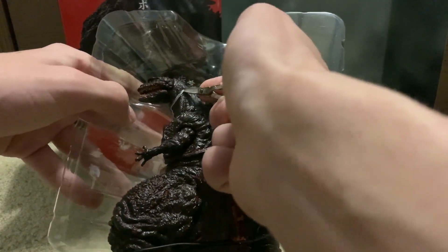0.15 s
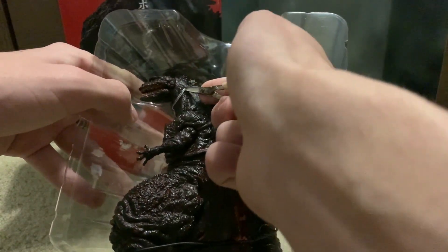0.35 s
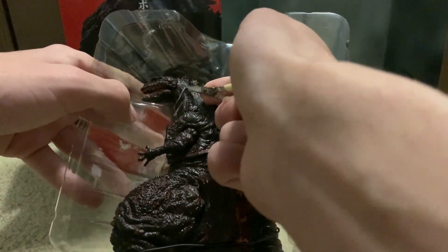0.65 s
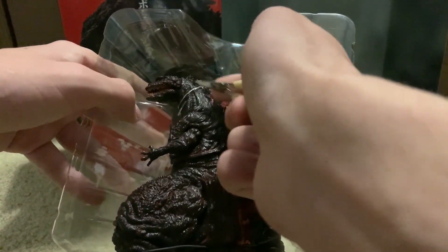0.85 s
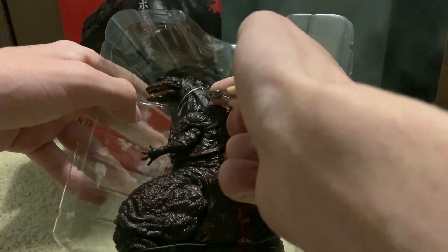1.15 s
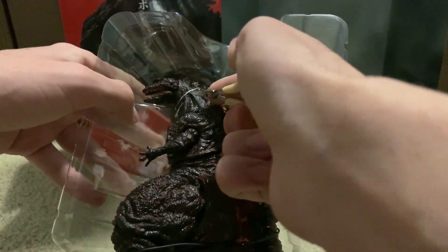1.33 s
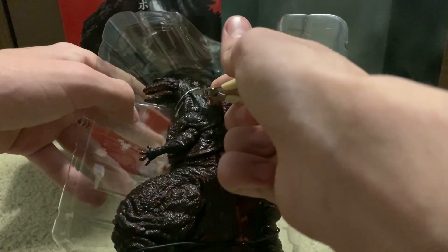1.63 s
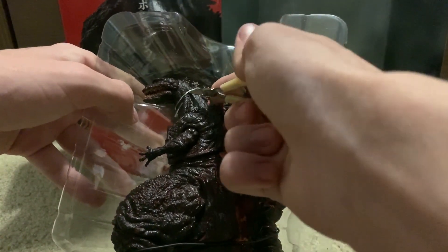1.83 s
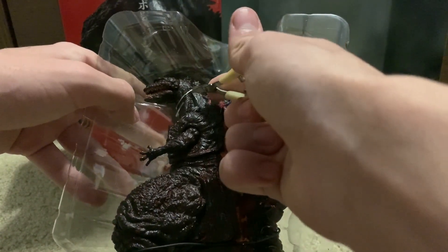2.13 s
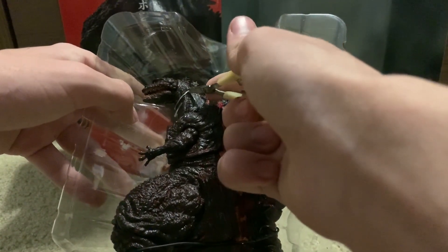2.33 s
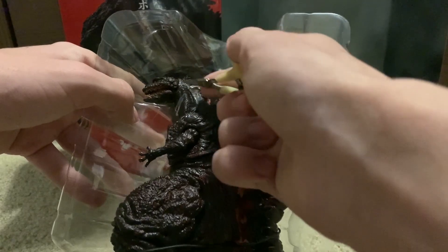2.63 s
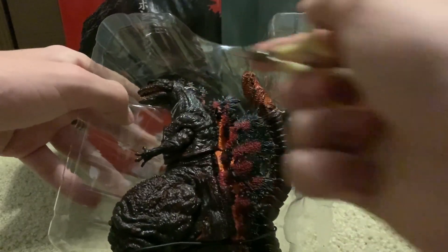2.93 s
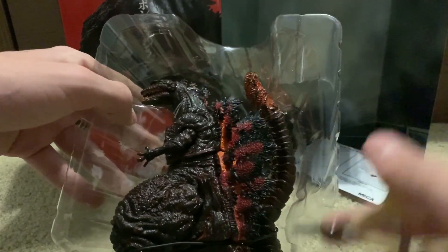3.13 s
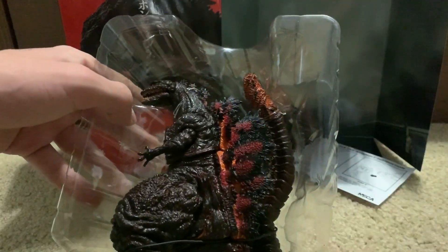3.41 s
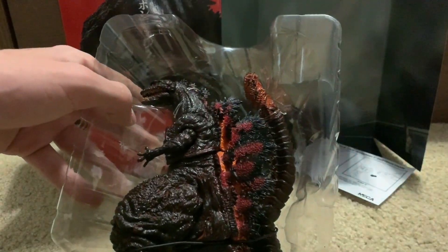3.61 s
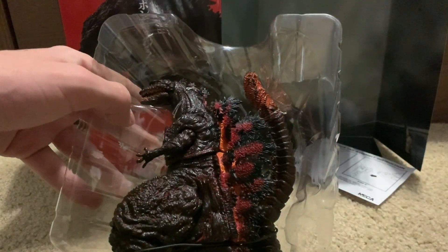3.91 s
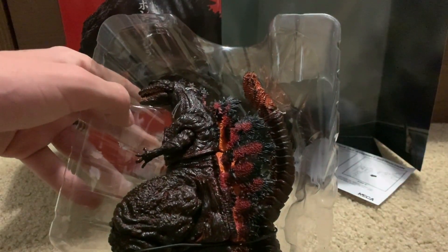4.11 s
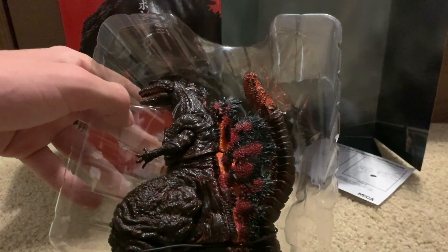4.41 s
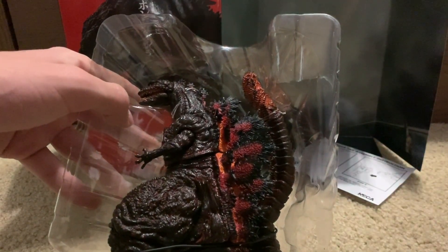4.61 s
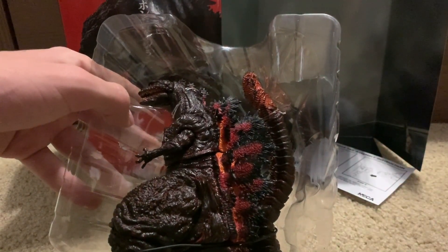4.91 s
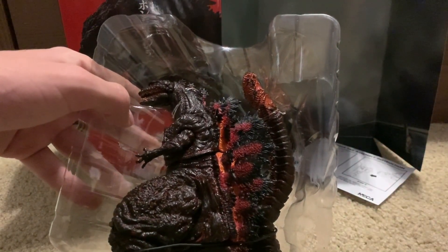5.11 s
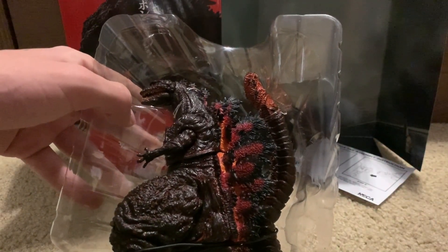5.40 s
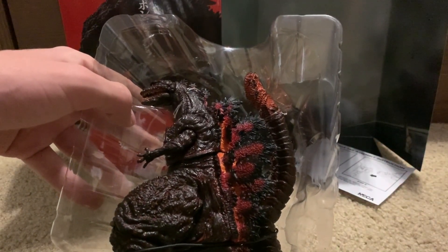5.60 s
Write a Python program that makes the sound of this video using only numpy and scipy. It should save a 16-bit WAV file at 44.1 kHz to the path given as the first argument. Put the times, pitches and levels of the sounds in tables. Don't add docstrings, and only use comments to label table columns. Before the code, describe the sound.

Heard very close in stereo, in a carpeted room with a short, quickly dying tail. Faint mains hum, uneven floor rumble and soft hiss continue throughout. The tail of an earlier snap opens it, with a tiny tap. From 0.3 to 0.8 seconds small scissors bite plastic ties in a dense run of sharp crackling snaps, strongest near 0.45 and 0.76, rattling a thin hollow tray. Light taps and knocks follow, then a snip at 2.06 and the hardest snap at 2.6, with short creaks around it. A distant engine climbs from 0.85, is loudest near 3.2, and drops away by 4.25. Taps and a brief sleeve swish come around 2.9, then near quiet. From 3.8 there are light plastic ticks, knocks and very faint short tones from the relaxing tray. A bright steel clack lands at 4.7, followed by faint ticks and soft finger rubs until about 5.6.

```python
import sys
import numpy as np
from scipy import signal
from scipy.fft import rfft, irfft, next_fast_len
from scipy.io import wavfile
from scipy.ndimage import uniform_filter1d

SR = 44100
rng = np.random.default_rng(int(sys.argv[2]) if len(sys.argv) > 2 else 0)


def how_loud(loudness_db):
    steps = np.asarray(loudness_db, float) / 20
    return 10 ** steps


def store_pcm(level_fs):
    pcm = np.round(np.clip(level_fs, -1, 1) * 32767).astype(np.int16)
    wavfile.write(sys.argv[1], SR, np.atleast_2d(pcm).T)


N = 253692

# (time [s], snap peak [dB], ring [Hz], tray thump [dB], blade fizz [dB])
EARLIER_SNAP = (0, -16, 4390, -27.5, -59)
EARLIER_S = 0.018
# (frequency [Hz], level [dB], t60 [s])
TRAY_MODES = [(195.85, -4, .15), (253.6, -7, 0.068), (315, -5.5, 0.079), (431, 3.5, 0.022),
              (482, -7, 0.057), (630, -6, 0.08)]
# (frequency [Hz], level [dB], t60 [s])
WALL_MODES = [(694, -4, 0.022), (1134, -9.5, .02), (1350, -5.5, 0.013), (1700, -0.5, 0.0071),
              (2240, 0, .012), (2800, -1, 0.012), (3500, -2.5, 0.015), (4250, 3.5, .007),
              (5400, -9, 0.0097)]
# (frequency [Hz], level [dB])
BLADE_TONE = [(2500, -42.5), (4500, -12), (6500, -5), (8000, 0), (10000, -0.5), (13000, -6.5),
              (15500, -6.5), (16800, -21)]
# (frequency [Hz], level [dB])
STEEL_TONE = [(2500, -34.5), (5800, -22.5), (7500, -6), (10300, -13), (12000, -2.5), (14300, -0.5),
              (15500, -15), (16800, -32.5)]
# (frequency [Hz], t60 [s])
ROOM_DECAY = [(150, .3), (500, 0.12), (1500, .3), (4000, 0.26), (9000, 0.28), (15000, 0.32)]
# (frequency [Hz], level [dB])
ROOM_TONE = [(150, -8.5), (500, -2), (1500, -15), (4000, -14.5), (9000, -20), (15600, -26), (16300, -45)]
# (frequency [Hz], level [dB])
HUM = [(60, -73.5), (120, -70), (188, -73), (360, -86), (480, -80.5), (1800, -100), (11300, -97.5),
       (13770, -96.5)]
# (time [s], level [dB])
RUMBLE = [(0.0, -86.5), (0.32, -71.5), (0.67, -60.5), (0.9, -73.5), (1.36, -75.5), (2.0, -70), (2.4, -72.5),
          (2.77, -64.5), (3.1, -75.5), (3.78, -76), (4.1, -68.5), (4.58, -80.5), (4.79, -69.5), (5.25, -76),
          (5.4, -68), (5.75, -72)]
# (frequency [Hz], level [dB])
RUMBLE_TONE = [(20, -44), (50, -4.5), (110, -1), (200, -6.5), (300, -13.5), (480, -17.5), (600, -32.5),
               (900, -58)]
# (frequency [Hz], level [dB])
HISS_TONE = [(300, -10.5), (700, -10), (1500, -12), (3000, -16.5), (6000, -20.5), (10000, -15.5),
             (15000, -19.5), (15500, -38)]
# (time [s], firing rate [Hz], level [dB])
ENGINE = [
    (.85, 113.4, -65),
    (1.7, 127.2, -62),
    (2.4, 138.7, -57),
    (3.2, 152.5, -55.5),
    (3.72, 164.6, -62),
    (3.9, 163.4, -56.5),
    (4.25, 148.7, -67),
]
# (time [s], level [dB])
SWISH = [
    (2.9, -80),
    (2.96, -74.5),
    (3.05, -74),
    (3.12, -91.5),
]
# (frequency [Hz], level [dB])
SWISH_TONE = [(1000, -18.5), (2500, -1.5), (4000, -14), (5400, -1.5), (7000, -11), (12000, -14),
              (16000, -32)]
# (time [s], length [s], frequency [Hz], level [dB])
SINGING = [
    (3.99, .12, 734, -83.5),
    (4.147, 0.1, 760, -85.5),
    (4.552, 0.079, 730, -80),
]
# (time [s], snap peak [dB], ring [Hz], tray thump [dB], blade fizz [dB])
CUTS = [(0.291, -16.5, 610, -28, -31.5), (0.4366, -25.5, 2420, -46.5, -34), (0.444, -25.5, 4500, -55, -48),
        (0.4499, -10, 763, -33, -14), (0.4535, -23, 1100, -34, -15), (0.495, -36.5, 1560, -37.5, -46),
        (0.602, -35, 790, -41, -73.5), (0.628, -30, 2280, -50, -60), (0.655, -36.5, 1260, -57.5, -53.5),
        (0.687, -17.5, 2430, -31.5, -43.5), (0.7614, -7.5, 691, -39.5, -21.5),
        (3.944, -59, 3894, -67.5, -83), (1.7404, -49, 4400, -55, -59), (2.056, -20.5, 637, -38.5, -29.5),
        (2.557, -54, 3000, -58, -68), (2.6076, -6, 486, -31, -14), (2.624, -28.5, 1420, -27, -40.5),
        (2.771, -55, 5040, -56, -65.5), (4.128, -57.5, 1600, -47.5, -51.5),
        (4.454, -63, 1200, -83.5, -63.5), (4.536, -62.5, 3200, -72, -85), (4.745, -53, 2520, -50, -51.5)]
# (time [s], snap peak [dB], ring [Hz], tray thump [dB])
TAPS = [(0.119, -51.5, 1110, -76), (0.202, -68, 980, -86), (0.28, -47, 1850, -72), (0.401, -67, 1200, -63),
        (0.535, -39.5, 802, -73), (0.558, -33.5, 1390, -42.5), (0.637, -36.5, 1080, -44),
        (0.857, -48, 1030, -43), (1.002, -57, 1140, -56), (1.414, -64, 859, -56), (1.46, -59.5, 1190, -55),
        (1.619, -70, 837, -76), (1.681, -68.5, 802, -75), (1.700, -63.5, 2710, -80),
        (1.846, -53, 2180, -56.5), (1.895, -61, 1170, -53), (1.94, -54.5, 1539, -57.5),
        (1.954, -44.5, 1103, -51.5), (2.53, -47, 902, -43), (2.565, -46.5, 700, -51),
        (2.73, -55.5, 818, -48.5), (2.766, -45, 1108, -47), (2.852, -44.5, 1147, -39.5),
        (2.885, -52.5, 3500, -72.5), (2.886, -42, 896, -44.5), (2.901, -57.5, 3500, -72),
        (3.759, -62.5, 1600, -63), (3.941, -44, 1370, -66), (4.548, -66, 1380, -58),
        (4.754, -44, 1170, -44.5)]
# (time [s], tray thump [dB], snap peak [dB])
KNOCKS = [(1.139, -49, -55), (1.149, -57, -71), (1.209, -51, -68), (1.544, -42.5, -65.5),
          (1.965, -45.5, -60.5), (2.043, -45, -41), (2.107, -39, -46), (2.899, -38.5, -44.5),
          (2.915, -41.5, -72), (2.919, -74, -54), (3.798, -43, -81), (4.78, -43.5, -68), (4.805, -47, -77),
          (5.377, -60.5, -77.5)]
# (time [s], peak [dB], ring [Hz], length [s])
RUBS = [(0.661, -41, 1190, 0.0084), (0.748, -43.5, 900, 0.0042), (1.031, -69.5, 1057, 0.017),
        (1.065, -61, 1160, 0.036), (1.909, -65.5, 1102, 0.027), (2.536, -49, 900, 0.052),
        (2.691, -49, 920, 0.041), (2.813, -54, 1462, 0.069), (3.959, -58.5, 1200, 0.018),
        (4.135, -63, 1400, 0.0059), (4.529, -70, 1200, 0.011), (4.763, -60, 947, 0.018),
        (5.164, -65, 900, 0.0097), (5.19, -61, 1298, 0.031), (5.194, -55, 467.5, .03),
        (5.28, -69.5, 1604, 0.026), (5.307, -64, 1000, 0.011), (5.429, -61.5, 1090, 0.039),
        (5.519, -62, 1198, 0.022), (5.556, -66.5, 900, 0.0099)]
# (time [s], blade fizz [dB], snap peak [dB], ring [Hz], tray thump [dB])
CLICKS = [
    (1.698, -53, -39, 1417, -51),
    (4.7096, -50, -65, 3000, -71.5),
    (4.7149, -21.5, -35.5, 3650, -53),
    (5.0889, -46, -70, 990, -66),
    (5.2028, -68, -67.5, 2800, -62),
]
# (frequency [Hz], phase [rad])
PORT_PHASE = [(20, 0), (1000, -.3), (2400, -1.7), (3800, -2.6), (6300, -5.8), (9000, -3.55), (10250, -2.75),
              (17000, 3.6)]
# (frequency [Hz], level [dB])
PORT_BALANCE = [(20, 2.5), (700, -1.17), (2500, 0), (4600, 9.5), (6500, -1), (17000, 1.5)]
# (frequency [Hz], likeness [0-1])
PORT_MONO = [(20, 0.98), (150, 0.82), (400, 0.23), (1200, 0.033), (5500, 0.025), (8300, 0.9), (13000, 1),
             (15500, 0.3)]

CUT_S, TAP_S, KNOCK_S, CLICK_S = 0.003, 0.0038, 0.0014, 0.004
KNOCK_HZ = 900
RUB_THUMP_DB = 2
TOUCH_FIZZ_DB, TOUCH_FIZZ_SLOPE = -48, 0.55
SLIP_DB_PER_S = 130.0
SNAP_SIZE = 4096


def evened(x):
    return x / np.sqrt(np.mean(x ** 2) + 1e-20)


def waver(shape, width):
    return evened(uniform_filter1d(uniform_filter1d(rng.standard_normal(shape), width), width))


def read(points, hz):
    f, value = np.transpose(points)
    return np.interp(np.log(hz + 1), np.log(f + 1), value)


def follow(rows):
    s, *columns = np.transpose(rows)
    t = np.arange(N) / SR
    gate = np.clip(np.minimum(t - s[0], s[-1] - t) / 0.0088, 0, 1)
    return [np.interp(t, s, column) for column in columns], gate


def diffuse(points, patchy_db, size=N):
    frames, hz = size // 256 + 5, np.fft.rfftfreq(1024, 1 / SR)
    a, b, c, d, patches = rng.standard_normal((frames, 513, 5)).T
    patches = evened(uniform_filter1d(uniform_filter1d(patches, 6, 0), 10, 1))
    same = np.clip(read(PORT_MONO, hz), 0, 1)[:, None]
    left = a + 1j * b
    right = same * left + np.sqrt(1 - same ** 2) * (c + 1j * d)
    z = np.array([left, right]) * how_loud(read(points, hz)[:, None] + patchy_db * patches)
    return evened(signal.istft(z, nperseg=1024, noverlap=768)[1][:, :size])


def colour(points):
    grid = np.linspace(0, 1, 128)
    return signal.minimum_phase(signal.firwin2(255, grid, how_loud(2 * read(points, grid * SR / 2))))


def highpass(x, order, hz):
    return signal.sosfilt(signal.butter(order, hz, "high", fs=SR, output="sos"), x)


def ring(modes, detune, t):
    hz, db, t60 = np.transpose(modes)[:, :, None]
    tones = np.sin(2 * np.pi * hz * detune[:len(modes), None] * t)
    return (how_loud(db - 60 * t / t60) * tones).sum(0)


def touches():
    cuts = [(*row, CUT_S) for row in [EARLIER_SNAP, *CUTS]]
    soft = [(*row, TAP_S) for row in TAPS]
    soft += [(s, db, KNOCK_HZ, thump_db, KNOCK_S) for s, thump_db, db in KNOCKS]
    soft += [(s, db, hz, db + RUB_THUMP_DB, length) for s, db, hz, length in RUBS]
    soft = [(s, db, hz, thump_db, TOUCH_FIZZ_DB + TOUCH_FIZZ_SLOPE * db, length)
            for s, db, hz, thump_db, length in soft]
    clicks = [(s, db, hz, thump_db, fizz_db, CLICK_S) for s, fizz_db, db, hz, thump_db in CLICKS]
    return cuts + soft + clicks


def crackle(chance, length):
    cracks = chance[0] * how_loud(4.0 * uniform_filter1d(chance[1], 8))
    slip = evened(uniform_filter1d(chance[1, ::-1], size=50))
    return cracks * how_loud(SLIP_DB_PER_S * length * slip)


def wall_ring(cracks, age, t, detune, snap_db, hz, length):
    bending = cracks * age ** 1.1 * np.exp(-2.6 * age)
    blunt = int(np.clip(-snap_db / 56.0, 0, 1) * 0.28 * SR / hz) + 1
    bending = uniform_filter1d(uniform_filter1d(bending, blunt), blunt)
    narrow_db = np.clip(0.8 - 0.098 * snap_db + 120.0 * length, 0, 18)
    reached = [(f, db - narrow_db * abs(np.log2(f / hz)), t60) for f, db, t60 in WALL_MODES]
    nearest = how_loud(-1.0 - 60 * t / (0.004 + 6.6 / hz)) * np.sin(2 * np.pi * hz * t)
    in_step = np.exp(-length / 0.005) * abs(bending) * np.cos(2 * np.pi * hz * t)
    walls = signal.fftconvolve(bending, nearest + ring(reached, detune, t))[:len(t)]
    walls = walls + 0.35 * signal.fftconvolve(in_step, nearest)[:len(t)]
    return highpass(walls, 2, 0.84 * hz)


def tray_thump(cracks, age, t, detune):
    shove = np.gradient(uniform_filter1d(abs(cracks) * age ** 2 * np.exp(-4.0 * age), 30))
    return signal.fftconvolve(shove, ring(TRAY_MODES, detune ** 0.4, t))[:len(t)]


def snap(row, chance, blade):
    _, snap_db, hz, thump_db, fizz_db, length = row
    t = np.arange(SNAP_SIZE) / SR
    age = t / max(length, 0.0004)
    cracks = crackle(chance, length)
    detune = 1 + 0.11 * chance[2]
    fizz = signal.fftconvolve(cracks * age ** 0.11 * np.exp(-3.5 * age), blade)[:len(t)]
    walls = wall_ring(cracks, age, t, detune, snap_db, hz, length)
    thump = tray_thump(cracks, age, t, detune[16:])
    fizz = fizz * how_loud(fizz_db + 10.0) / abs(fizz).max()
    walls = walls * how_loud(snap_db) / abs(walls).max()
    thump = thump * how_loud(thump_db + 2.5) / abs(thump).max()
    crisp = walls + fizz
    power = uniform_filter1d(abs(rfft(crisp)) ** 2, size=220)
    all_round = np.roll(irfft(np.sqrt(abs(power))), 100)
    return np.array([crisp + thump, all_round * (t < 0.01) + thump])


def scissors(lead):
    rows, track = touches(), np.zeros((2, N + lead + SNAP_SIZE))
    starts = [-EARLIER_S] + [row[0] for row in rows[1:]]
    blades = [colour(BLADE_TONE)] * (len(rows) - len(CLICKS)) + [colour(STEEL_TONE)] * len(CLICKS)
    chances = rng.standard_normal((len(rows), 3, SNAP_SIZE))
    for s, row, blade, chance in zip(starts, rows, blades, chances):
        at = lead + round(s * SR)
        track[:, at:at + SNAP_SIZE] += snap(row, chance, blade)
    return highpass(track[:, :N + lead], 4, 110.0)


def room(x):
    noise = diffuse([(20, 0.0085), (20000, 0.0019)], patchy_db=1, size=SR // 2)[:, SR // 4:]
    hz, t, z = signal.stft(noise, SR, nperseg=256)
    decay_db = read(ROOM_TONE, hz)[:, None] - 60 * t / read(ROOM_DECAY, hz)[:, None]
    tail = signal.istft(z * how_loud(decay_db), SR, nperseg=256)[1]
    age = np.arange(tail.shape[1]) / SR
    onset = np.clip((age - 0.003) / 0.002, 0, 1)
    gate = 1 / (1 + (age / 0.115) ** 6.0)
    tail *= onset * gate / np.sqrt(0.032 * SR)
    return signal.fftconvolve(x[None], tail, axes=1)[:, :len(x)]


def hum():
    t, out = np.arange(N) / SR, np.zeros(N)
    for hz, db in HUM:
        level, phase = waver((2, N), 900)
        turn = 2 * np.pi * hz * t
        out += how_loud(db) * ((1 + 0.41 * level) * np.sin(turn) + 0.35 * phase * np.cos(turn))
    return out


def rumble():
    (db,), _ = follow(RUMBLE)
    return how_loud(db + 9.0) * diffuse(RUMBLE_TONE, patchy_db=3.3)


def hiss():
    return how_loud(-81) * diffuse(HISS_TONE, patchy_db=-0.88)


def engine():
    (hz, db), gate = follow(ENGINE)
    turn = 2 * np.pi * np.cumsum(hz) / SR
    level = np.sqrt(2) * gate * how_loud(db + 2.3 * waver(N, 1500))
    return level * (np.sin(turn) + how_loud(-28.5) * np.sin(2 * turn))


def swish():
    (db,), gate = follow(SWISH)
    return gate * how_loud(db) * diffuse(SWISH_TONE, patchy_db=1)


def singing():
    t, out = np.arange(N) / SR, np.zeros(N)
    for s, length, hz, db in SINGING:
        swell = np.sin(np.pi * np.clip((t - s) / length, 0, 1))
        out += how_loud(db) * np.maximum(swell, 0) ** 0.5 * np.sin(2 * np.pi * hz * t)
    return out


def scene():
    lead = 4096
    near, all_round = scissors(lead)
    close = (near + room(all_round))[:, lead:]
    return close + hum() + rumble() + hiss() + engine() + swish() + singing()


def top_cut(x):
    return signal.sosfilt(signal.butter(12, 16870, fs=SR, output="sos"), x)


def record(dry):
    size = next_fast_len(N + 4096)
    hz = np.fft.rfftfreq(size, 1 / SR)
    half = how_loud(read(PORT_BALANCE, hz) / 2) * np.exp(0.5j * read(PORT_PHASE, hz))
    ports = irfft(rfft(dry, size) * np.array([half, 1 / half]), size)[:, :N]
    return top_cut(ports)


dry = scene()
out = record(dry)
store_pcm(out)
```